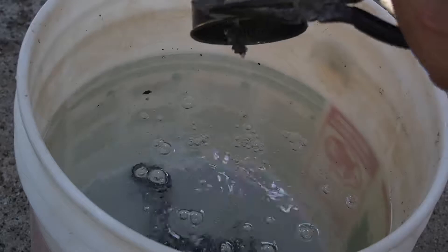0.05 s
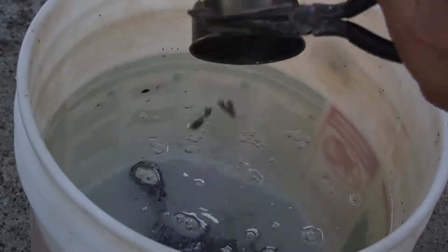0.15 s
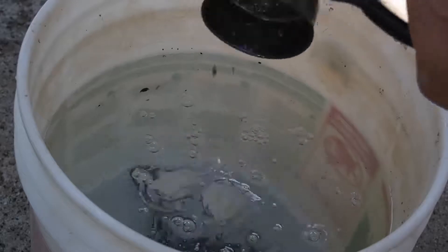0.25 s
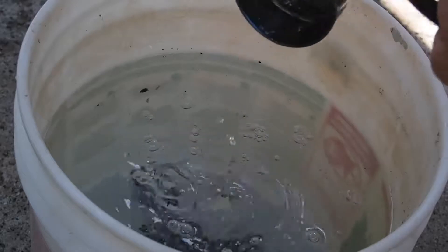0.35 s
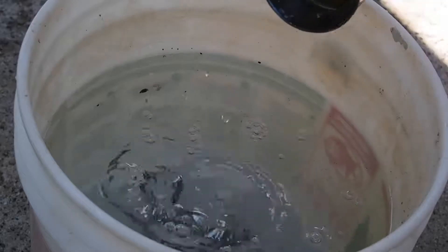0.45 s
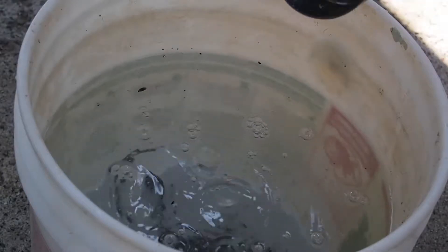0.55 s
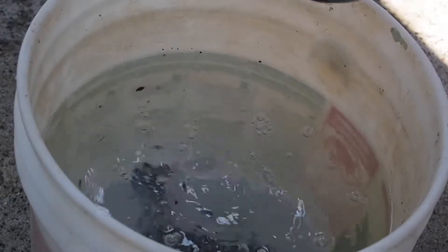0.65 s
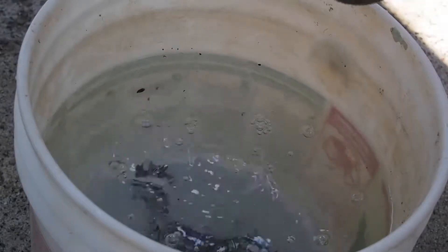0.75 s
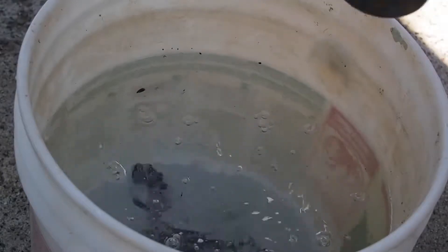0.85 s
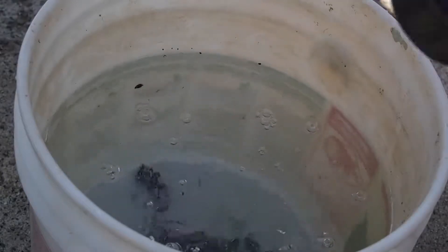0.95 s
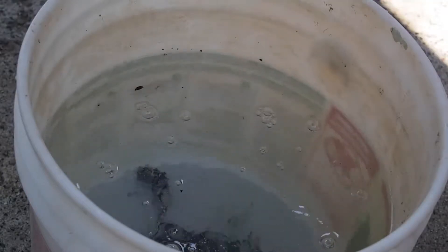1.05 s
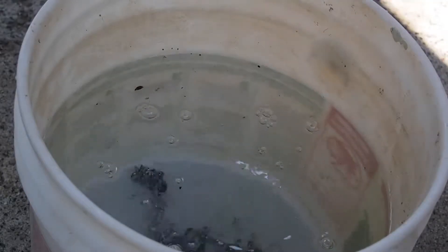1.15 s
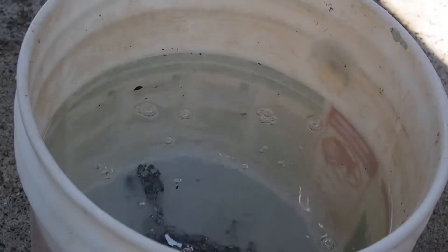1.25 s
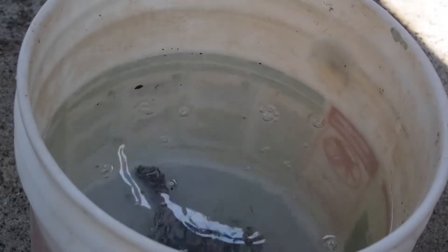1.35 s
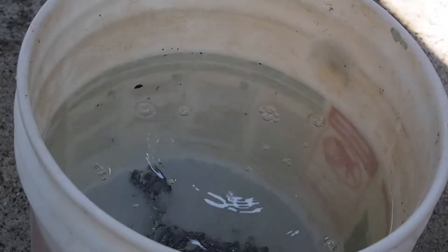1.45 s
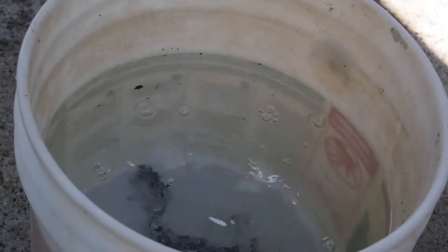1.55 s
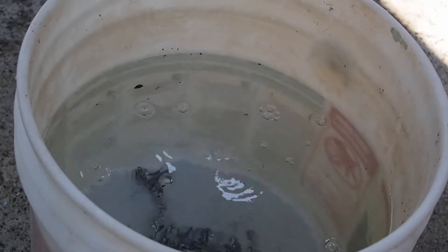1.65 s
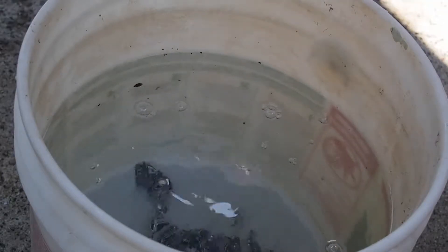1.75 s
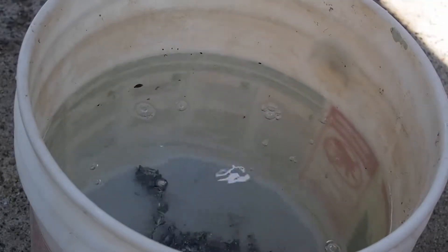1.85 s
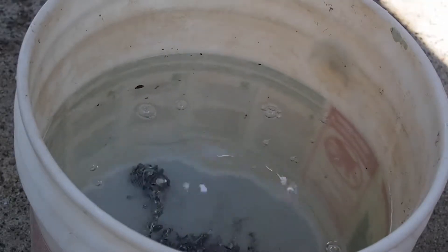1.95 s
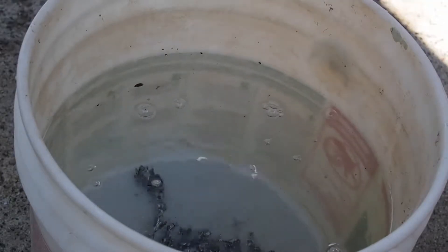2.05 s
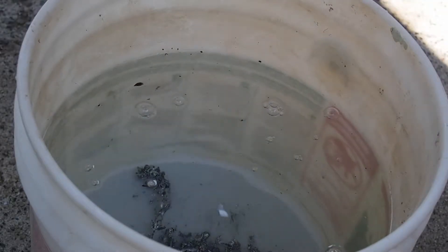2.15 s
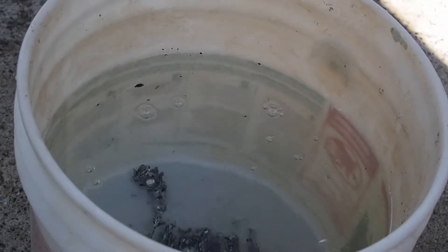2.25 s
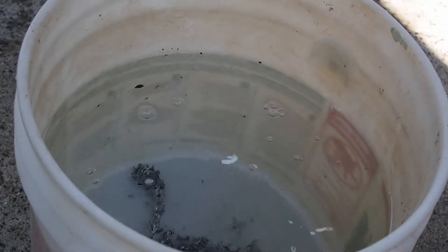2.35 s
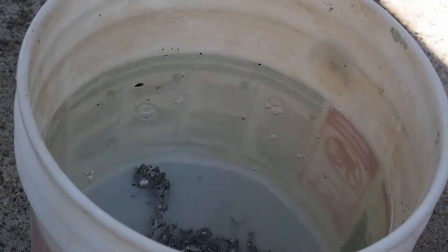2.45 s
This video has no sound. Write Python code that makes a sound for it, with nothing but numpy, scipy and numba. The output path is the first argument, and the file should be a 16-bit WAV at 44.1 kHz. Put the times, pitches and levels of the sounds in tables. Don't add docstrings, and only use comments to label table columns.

```python
import sys
import numpy as np
from scipy import signal
from scipy.fft import rfft, irfft
from scipy.io import wavfile
from numba import njit

SR = 44100
rng = np.random.default_rng(int(sys.argv[2]) if len(sys.argv) > 2 else 0)


def store_wav(level_fs):
    pcm = np.round(np.clip(np.atleast_2d(level_fs), -1, 1) * 32767)
    wavfile.write(sys.argv[1], SR, pcm.T.astype(np.int16))


def invert_db(level):
    return 10 ** (np.asarray(level, dtype=float) / 20)


N = 108045
TIME = np.arange(N) / SR
HZ = np.arange(N // 2 + 1) * SR / N


def rms_one(x):
    return x / np.sqrt(np.mean(x ** 2) + 1e-20)


def in_time(rows):
    s, *columns = np.transpose(rows)
    return [np.interp(TIME, s, column) for column in columns]


def at_hz(points, hz):
    table_hz, value = np.array(points).T
    return np.interp(np.log(hz + 1), np.log(table_hz), value)


def colour(x, spectrum):
    inside = (HZ > spectrum[0][0]) & (HZ < spectrum[-1][0])
    return rms_one(irfft(rfft(x) * invert_db(at_hz(spectrum, HZ)) * inside, N))


def noise():
    return rng.standard_normal(N)


def drift(rate_hz):
    r = np.exp(-2 * np.pi * rate_hz / SR)
    wander = signal.lfilter([1], [1, -2 * r, r * r], rng.standard_normal(N + SR))
    return rms_one(wander[SR:])


def grit(rate_per_s, spread_db):
    sizes = invert_db(spread_db * np.minimum(rng.exponential(1, N), 4))
    signs = rng.choice([-1, 1], N)
    return rms_one(sizes * signs * (rng.random(N) < rate_per_s / SR))


def ring(x, hz, t60_s):
    r = invert_db(-60 / (max(t60_s, .0006) * SR))
    turn = 2 * np.pi * hz / SR
    return signal.lfilter([0, np.sin(turn)], [1, -2 * r * np.cos(turn), r * r], x + 1e-18)


def click(s, cut_hz):
    x = np.zeros(N)
    x[int(s * SR)] = 1
    return signal.lfilter(*signal.butter(2, np.clip(cut_hz, 200, .45 * SR), fs=SR), x + 1e-18)


def strokes(rows):
    total = 0
    for start_s, rise_s, hold_s, fall_db_per_s, level_db in rows:
        rise = np.clip((TIME - start_s) / rise_s, 0, 1)
        falling_s = np.clip(TIME - start_s - rise_s - hold_s, 0, None)
        total = total + rise * invert_db(level_db - fall_db_per_s * falling_s)
    return total


@njit
def glide(x, r, c):
    y = np.zeros(len(x))
    for i in range(2, len(x)):
        push = (1 - r[i] ** 2) / 2 * (x[i] - x[i - 2])
        y[i] = push + 2 * r[i] * c[i] * y[i - 1] - r[i] ** 2 * y[i - 2]
    return y


def resonance(x, hz, width_hz):
    hz = np.clip(hz + np.zeros(N), 20, .47 * SR)
    r = np.exp(-np.pi * (np.abs(width_hz) + np.zeros(N)) / SR)
    return glide(x, r, np.cos(2 * np.pi * hz / SR))


def noise_band(hz, width_hz):
    return rms_one(resonance(resonance(noise(), hz, width_hz), hz, width_hz))


def yard(x):
    t = np.arange(SR // 2) / SR
    fade = invert_db(-60 * t / 0.2) + invert_db(14.5 - 60 * t / 0.022)
    tail = rng.standard_normal((2, len(t))) * fade * (t > .001)
    tail = signal.lfilter(*signal.butter(1, [500, 13500], "band", fs=SR), tail)
    tail = tail / np.sqrt(np.sum(tail ** 2, axis=1, keepdims=True))
    return invert_db(-16.5) * signal.fftconvolve(x, tail, axes=1)[:, :N]


def place(x, pan_db, treble_pan_db, lag_samples, echo_db):
    turns = HZ / SR
    half = invert_db((pan_db + treble_pan_db * turns * 3) / 2)
    left, right = rfft(x * np.ones((2, 1)))
    left = left * half * np.exp(-2j * np.pi * turns * lag_samples)
    direct = irfft([left, right / half], N)
    return direct + invert_db(echo_db) * yard(direct)


def machinery():
    # pitch_hz [Hz], width_hz [Hz], level_db [dB]
    hum_bands = [(58.9, 0.67, -50), (120.3, 15, -56), (171.3, 3.04, -50.5), (230.8, 11.8, -51.5)]
    hz, width_hz, level_db = hum_bands[0]
    phase = 2 * np.pi * np.cumsum(hz + width_hz * drift(0.89)) / SR
    hum = np.sqrt(2) * invert_db(level_db + drift(0.26)) * np.sin(phase)
    for hz, width_hz, level_db in hum_bands[1:]:
        hum = hum + invert_db(level_db) * noise_band(hz, width_hz)
    return hum


def outdoor_air():
    # pitch_hz [Hz], level_db [dB per Hz]
    rumble_spectrum = [(26, -43), (45, -8.5), (231, 0), (420, -15), (550, -35), (920, -120)]
    # pitch_hz [Hz], level_db [dB per Hz]
    air_spectrum = [(400, -15.5), (512, -0.5), (1030, -2), (1710, -4), (1900, -8.5), (6600, -18),
                    (9000, -23), (16400, -29.5)]
    # time_s [s], level_db [dB]
    swell = [
        (0, -1.7),
        (.3, 0.8),
        (.75, -0.3),
        (1.0, -0.6),
        (1.4, -0.5),
        (1.8, 0.3),
        (2.45, 0),
    ]
    # pitch_hz [Hz], likeness [0-1]
    likeness = [(60, 0.93), (500, 0.98), (2000, 1), (6000, 0.38), (14000, 0.31)]

    def layer():
        rumble = invert_db(-46) * colour(noise(), rumble_spectrum)
        return rumble + invert_db(-42 + in_time(swell)[0]) * colour(noise(), air_spectrum)

    alike = np.clip(at_hz(likeness, HZ), 0, 1)
    mid = irfft(rfft(layer()) * np.sqrt((1 + alike) / 2), N)
    side = irfft(rfft(layer()) * np.sqrt((1 - alike) / 2), N)
    return mid + side * [[1], [-1]]


def wisps():
    # start_s [s], length_s [s], pitch_hz [Hz], width_hz [Hz], level_db [dB]
    puffs = [
        (0, 0.077, 13000, 900, -58.5),
        (0, .1, 7000, 2500, -63),
        (0.55, 0.083, 6260, 1500, -61),
        (0.615, 0.09, 4760, 60, -62),
        (0.987, 0.11, 7560, 80, -61),
    ]
    total = 0
    for start_s, length_s, hz, width_hz, level_db in puffs:
        swell = np.sin(np.pi * np.clip((TIME - start_s) / length_s, 0, 1)) ** .5
        total = total + invert_db(level_db) * swell * noise_band(hz, width_hz)
    return total


def bubbles():
    # time_s [s], level_db [dB], pitch_hz [Hz], t60_s [s]
    pops = [(.017, -41.5, 6000, 0.021), (0.269, -44, 2870, 0.1), (.271, -27, 790, 0.03),
            (.287, -30, 1140, .03), (.305, -29, 624, 0.047), (.384, -32.5, 4075, 0.13),
            (0.388, -14, 13500, 0.0033), (0.39, -21.5, 1650, 0.032), (.405, -29, 950, 0.027),
            (.412, -35, 7200, .004), (.451, -34, 14900, .002), (0.486, -31.5, 1458, 0.05),
            (.5, -35, 10800, 0.00097), (.685, -41.5, 6160, .01), (.716, -38, 11500, .0015),
            (.92, -29.5, 12500, 0.001)]
    return sum(invert_db(db) * ring(click(s, 1.14 * hz), hz, t60_s) for s, db, hz, t60_s in pops)


def steam_flash(path, overtones, spectrum, wall_db):
    level_db, hz = in_time(path)
    start_s, end_s = path[0][0], path[-1][0]
    steam = invert_db(level_db) * (TIME > start_s) * (TIME < end_s) * colour(grit(16000, 2), spectrum)
    out = 0.29 * steam + invert_db(wall_db) * resonance(steam, 6030, 210)
    steam = steam * np.clip((TIME - start_s) / 0.0092 - .4, 0.2, 1)
    for multiple, width, db in overtones:
        wavering_hz = multiple * hz * invert_db(0.15 * drift(110))
        out = out + invert_db(db) * resonance(steam, wavering_hz, width * multiple * hz)
    return out


def first_drop():
    # time_s [s], steam_db [dB], cavity_pitch_hz [Hz]
    path = [
        (.206, -53, 3730),
        (.213, -14, 3700),
        (.222, -22.5, 3480),
        (.235, -15, 3570),
        (.252, -20, 3180),
        (.266, -16.5, 3010),
        (.273, -23, 2820),
        (.285, -31, 2870),
        (.34, -50, 2860),
    ]
    # multiple [of pitch], width [share of pitch], level_db [dB]
    overtones = [(1.0, 0.046, 14.5), (1.6, 0.4, 3), (.49, 0.096, -5.5)]
    # pitch_hz [Hz], level_db [dB per Hz]
    spectrum = [(240, -55), (400, -6.5), (1390, -11), (5500, -11.5), (8500, -12.5), (12500, -6.5),
                (15000, -8.5), (16500, -23)]
    return steam_flash(path, overtones, spectrum, wall_db=-9)


def second_drop():
    # time_s [s], steam_db [dB], cavity_pitch_hz [Hz]
    path = [
        (.362, -56, 13500),
        (.367, -20, 12200),
        (.372, -27, 8300),
        (.377, -22.5, 5930),
        (.382, -31, 4150),
        (.389, -25.5, 4000),
        (.394, -41, 3950),
        (.41, -41.5, 4150),
        (.44, -55, 4100),
    ]
    # multiple [of pitch], width [share of pitch], level_db [dB]
    overtones = [(1.0, 0.19, 10.5), (1.45, 0.12, 1.6)]
    # pitch_hz [Hz], level_db [dB per Hz]
    spectrum = [(530, -41), (900, -7), (4000, -11.5), (8000, -11), (12500, -7.5), (16500, -6.5)]
    return steam_flash(path, overtones, spectrum, wall_db=-60)


def scuffs():
    # start_s [s], rise_s [s], hold_s [s], fall_db_per_s [dB/s], level_db [dB]
    slides = [
        (0.854, 0.027, 0.028, 302, -47.5),
        (1.47, 0.012, 0.073, 400, -40),
        (1.611, 0.0082, 0.0056, 900, -25.5),
        (1.628, 0.012, 0.026, 332, -32),
        (2.27, 0.024, 0.029, 150, -46.5),
        (2.384, 0.0078, 0.0068, 398, -39),
    ]
    # pitch_hz [Hz], level_db [dB per Hz]
    gravel_spectrum = [(600, -9.5), (1150, -9), (2000, -6), (3000, 0.5), (4500, -7.5), (16500, -33)]
    gravel = strokes(slides) * invert_db(2.9 * drift(45)) * colour(grit(4000, 0.4), gravel_spectrum)
    return gravel + invert_db(-6) * ring(click(1.6205, 6600), 3040, 0.0055)


def squeak():
    # [dB, lifts the upper partials]
    course = [
        (1.195, 5490, -53, 1),
        (1.21, 5160, -42, -5),
        (1.256, 5284, -45.5, -14),
        (1.282, 5370, -51, 12),
        (1.31, 5530, -47, 8),
        (1.345, 5594, -44.5, 0),
        (1.38, 5510, -43, 3),
        (1.412, 5560, -55, -3),
        (1.49, 5680, -67, -20),
    ]
    # multiple [of pitch], level_db [dB], strain_share [share of the strain]
    partials = [(.5, -11.5, -0.59), (1.0, 7.5, 0.087), (1.5, -19, 0.91), (2.0, -22.5, 0.4),
                (2.5, -20.5, 0.22)]
    hz, level_db, strain_db = in_time(course)
    phase = 2 * np.pi * np.cumsum(hz * (1 + 0.005 * drift(100))) / SR
    tone = 0
    for multiple, db, share in partials:
        flutter_db = 2 * drift(38)
        tone = tone + invert_db(db + strain_db * share + flutter_db) * np.sin(multiple * phase)
    sounding = (TIME > course[0][0]) * (TIME < course[-1][0])
    snap = invert_db(-33) * ring(click(1.2, 12000), 6400, 0.0036)
    return np.sqrt(2) * invert_db(level_db) * tone * sounding + snap


def rocking_ring(x, hz, t60_s):
    width_hz = np.log(1000) / (np.pi * t60_s)
    return resonance(x, hz * invert_db(.03 * drift(25)), width_hz) * SR / (2 * np.pi * width_hz)


def rim(taps, grains, held):
    # pitch_hz [Hz], level_db [dB]
    strong_modes = [(5950, -3), (6895, 9.5), (7830, -15), (11350, -3), (13000, -13)]
    crowd_hz = np.linspace(3500, 15800, 24) * rng.uniform(.97, 1.0, 24)
    modes = [(hz, db, -17) for hz, db in strong_modes]
    modes += [(hz, -16.5, -6) for hz in crowd_hz]
    late = TIME > 1.912
    out = 0
    for hz, db, muted_db in modes:
        struck = invert_db(-41 + rng.normal(0, 5, len(taps))) @ taps
        rubbed = invert_db(-22 + muted_db * late + 6 * held + 4.5 * drift(14)) * grains
        push = struck * invert_db(muted_db * late / 2) + rubbed
        out = out + invert_db(db) * ring(push, hz, 0.033 * rng.uniform(0.2, 1))
    return out


def cup():
    # time_s [s], level_db [dB], tilt [0 flat - 1 tilted], contact_cut_hz [Hz]
    knocks = [(1.846, -7, 0, 4000), (1.8935, -24, 0.3, 5000), (1.9413, -12.5, 1, 5370),
              (1.9988, -15, 0.13, 1500), (2.008, -24, 0.78, 12000), (2.02, -14, 0.16, 1500),
              (2.111, -26.5, 0.05, 12900), (2.1214, -42, 0.7, 5100), (2.1369, -28, 0.47, 13000),
              (2.156, -39, 0.9, 4960), (2.173, -43, 0.1, 5980), (2.216, -34, 0.46, 12200),
              (2.277, -31.5, 0.65, 1970)]
    # start_s [s], rise_s [s], hold_s [s], fall_db_per_s [dB/s], level_db [dB]
    scrapes = [(1.853, 0.004, 0.01, 206, -27), (1.882, 0.0098, 0.006, 303, -30.5),
               (1.925, 0.0099, 0.018, 497, -30), (1.955, 0.017, 0.065, 300, -42),
               (2.008, 0.0019, 0.033, 113, -46.5), (2.112, 0.00087, .002, 900, -31),
               (2.116, 0.0055, .003, 900, -26.5), (2.134, 0.00088, 0.0032, 346, -23.5),
               (2.152, .003, 0.033, 298, -36), (2.218, 0.00076, 0.002, 306, -36),
               (2.25, 0.038, 0.031, 254, -46.5), (2.36, 0.024, 0.024, 199, -43.5)]
    # pitch_hz [Hz], flat_db [dB], tilted_db [dB], scraped_db [dB], t60_s [s]
    modes = [(1135, -31, -16, -11.5, 0.18), (1258, -49, -3.5, -10, 0.38), (1321, 0.5, -43, 6, 0.1),
             (1364, -38, -5.5, -17, 0.32), (1552, -47, -14, -20, 0.29), (1762, -43, -13.5, -7, 0.17),
             (2015, -13, -14, -0.5, 0.08), (2337, -16, -19, -7.5, 0.16), (2505, -22, -14.5, -12, 0.22),
             (3004, -11, 2.5, 4, 0.065), (3083, -41, -9.5, 1.5, 0.19), (3993, -22, -23, 5, 0.037),
             (4080, -19, -31, -5, 0.1), (5100, -40, -41, -36, 0.097)]
    taps = np.array([invert_db(db) * click(s, cut_hz) for s, db, tilt, cut_hz in knocks])
    all_taps = sum(taps)
    tilted = sum(tap * knock[2] for tap, knock in zip(taps, knocks))
    flat = all_taps - tilted

    grains = strokes(scrapes) * grit(6000, 3.0)
    out = invert_db(1) * signal.lfilter(*signal.butter(1, [1700, 4400], "band", fs=SR), grains)
    held = TIME > 2.1
    out += invert_db(12) * resonance(grains * held, 4045 * invert_db(.2 * drift(37)), 210)
    grains = grains * invert_db(-7.5 * held)
    out += rim(taps, grains, held) + invert_db(13) * taps[0]
    for hz, flat_db, tilted_db, scraped_db, t60_s in modes:
        struck = invert_db(flat_db) * flat + invert_db(tilted_db) * tilted
        rubbed = invert_db(scraped_db + 4 - 32.5) * grains * invert_db(1.9 * drift(40))
        out += rocking_ring(struck + rubbed, hz, t60_s)

    t = np.arange(SR // 10) / SR
    burst = rng.standard_normal(len(t)) * invert_db(-60 * t / 0.0075)
    crack = signal.fftconvolve(all_taps, burst)[:N]
    crack = signal.sosfilt(signal.butter(2, 1300, "high", fs=SR, output="sos"), crack)
    steel = signal.sosfilt(signal.butter(4, 850, "high", fs=SR, output="sos"), out + invert_db(3.5) * crack)
    thud = invert_db(-11) * ring(taps[0], 745, 0.0082)
    return steel + thud


def scene():
    background = machinery() + outdoor_air()
    water = first_drop() + second_drop() + bubbles() + wisps()
    out = place(background, pan_db=-2, treble_pan_db=-2.5, lag_samples=3, echo_db=-72)
    out += place(water, pan_db=0, treble_pan_db=-5.5, lag_samples=0.2, echo_db=10)
    out += place(scuffs() + squeak(), pan_db=-0.5, treble_pan_db=-11.5, lag_samples=5, echo_db=10.5)
    return out + place(cup(), pan_db=-0.9, treble_pan_db=-8, lag_samples=3.5, echo_db=7.5)


def roll_off(x):
    return signal.sosfilt(signal.butter(12, 16640, fs=SR, output="sos"), x)


def record(dry):
    duck_from_db, duck_share, recover_db_per_s = -8, .8, 30
    level_db = 20 * np.log10(np.abs(dry).max(axis=0) + 1e-9)
    over_db = np.maximum(level_db - duck_from_db, 0) * duck_share
    recovery_db = recover_db_per_s * TIME
    duck_db = np.maximum.accumulate(over_db + recovery_db) - recovery_db
    ducked = dry * invert_db(-signal.lfilter([.01], [1, -.99], duck_db))
    softened = 1.2 * np.tanh(ducked / 1.2)
    mix = signal.sosfilt(signal.cheby2(18, 60, 16500, fs=SR, output="sos"), softened)
    return roll_off(mix)


dry = scene()
out = record(dry)
store_wav(out)
```